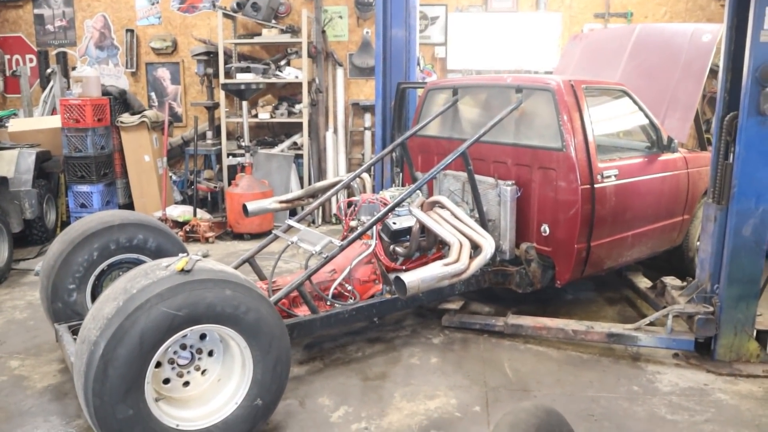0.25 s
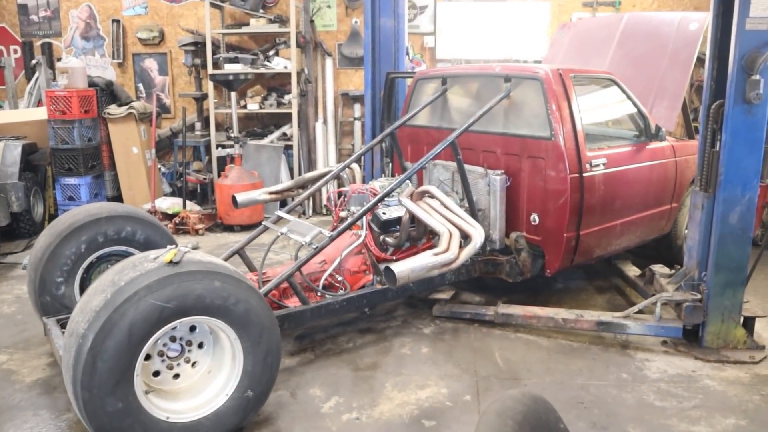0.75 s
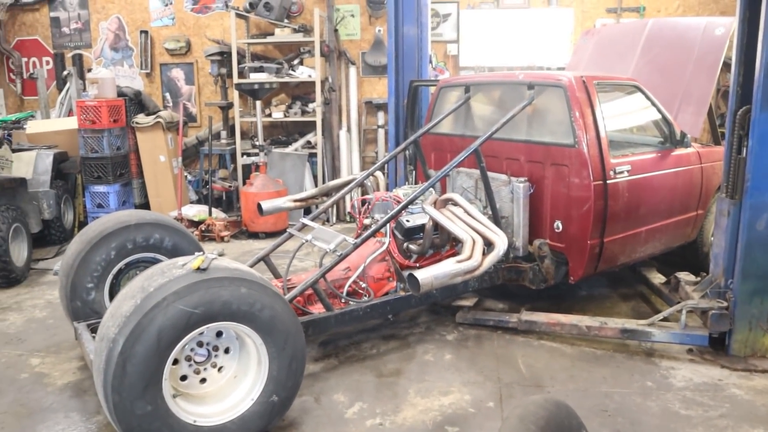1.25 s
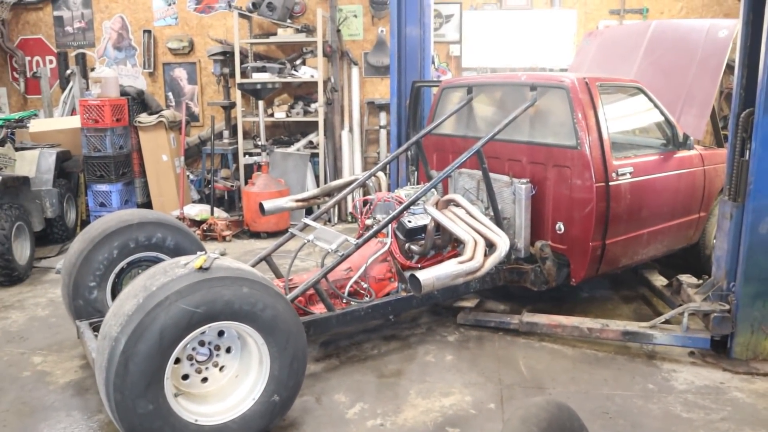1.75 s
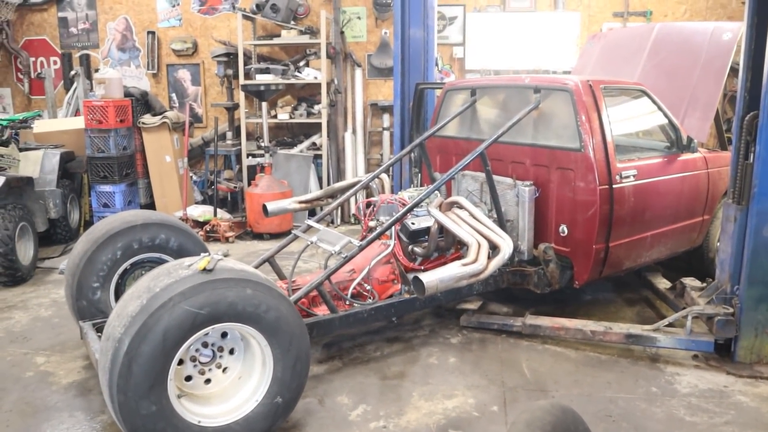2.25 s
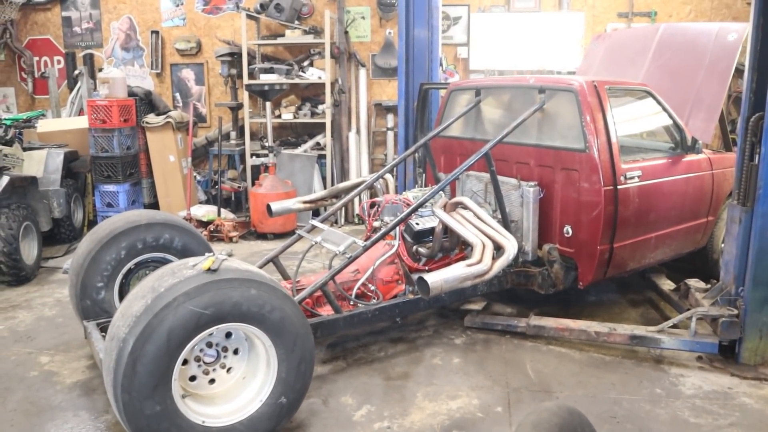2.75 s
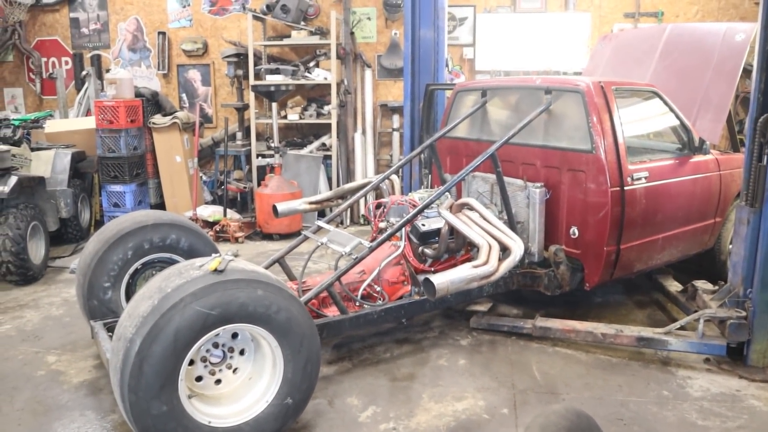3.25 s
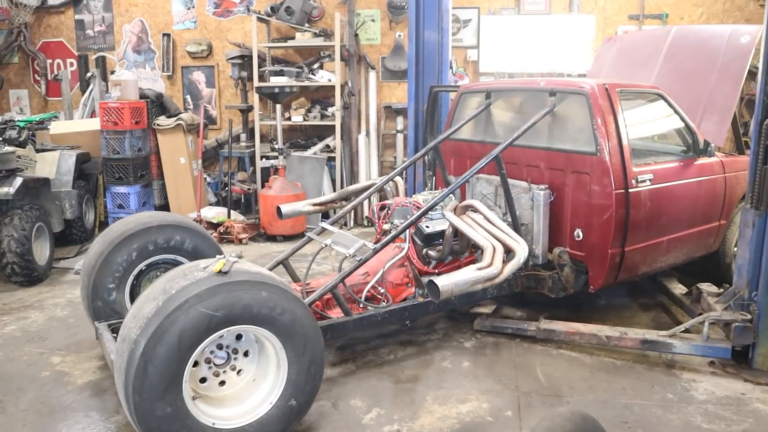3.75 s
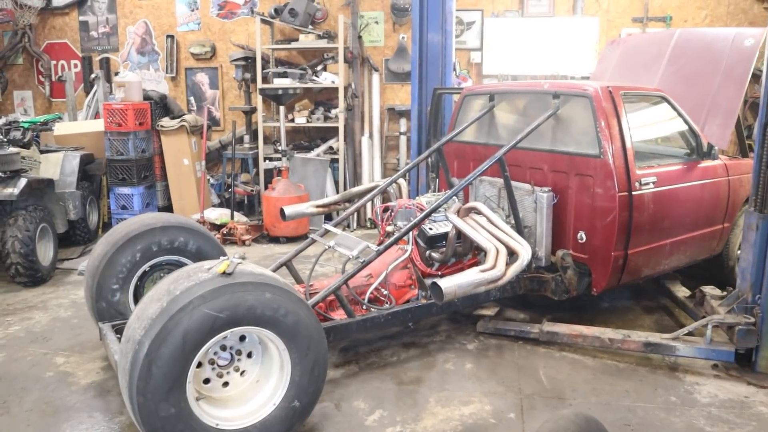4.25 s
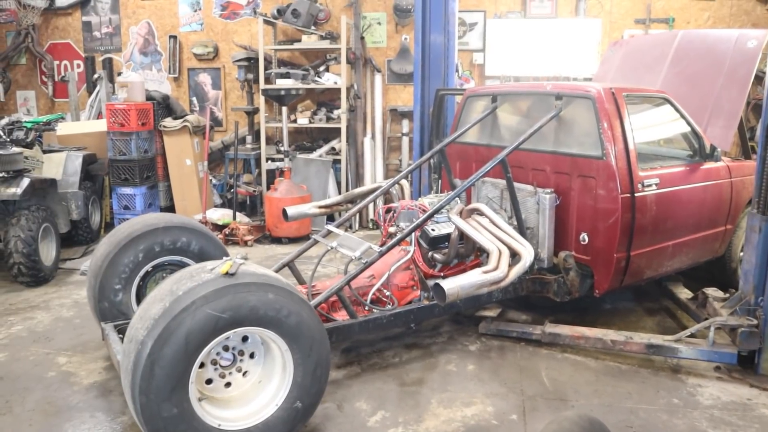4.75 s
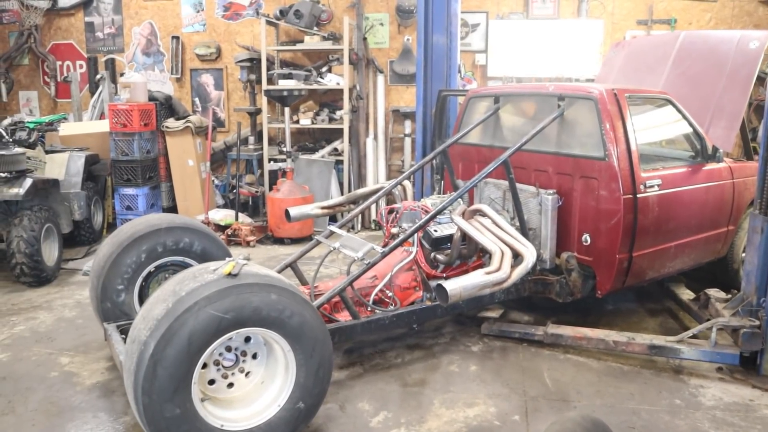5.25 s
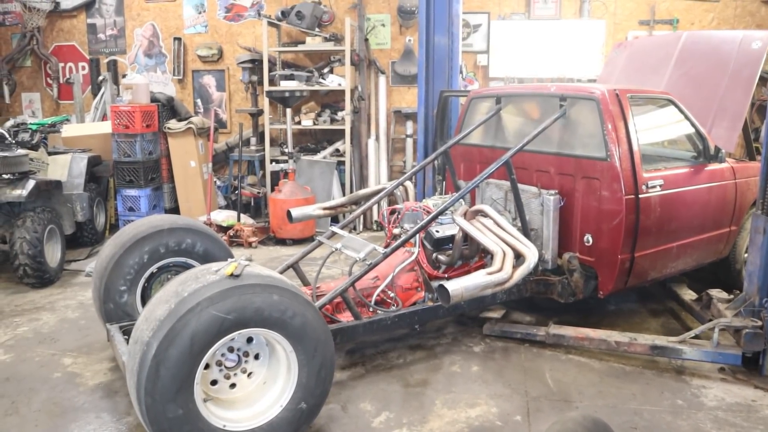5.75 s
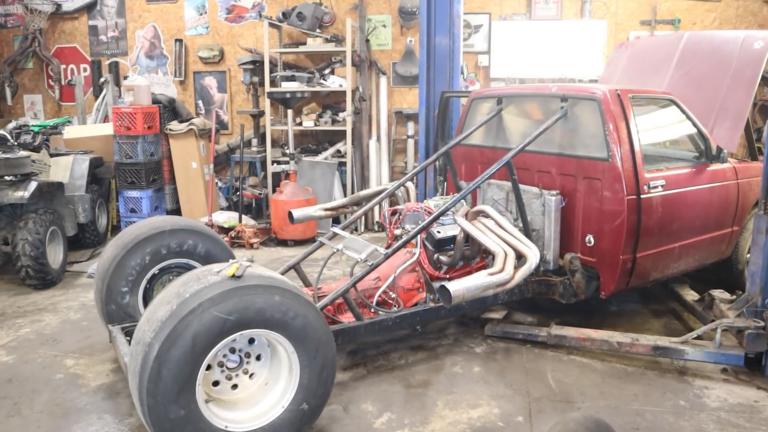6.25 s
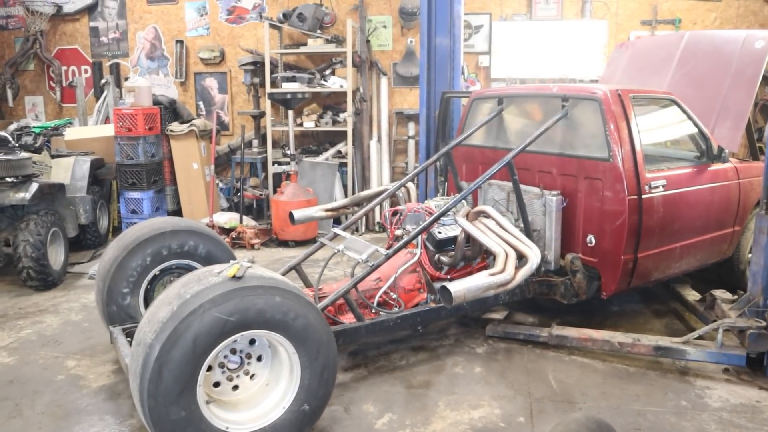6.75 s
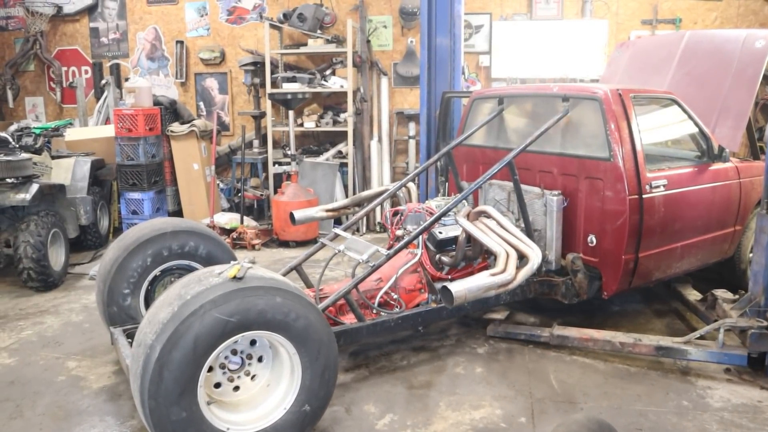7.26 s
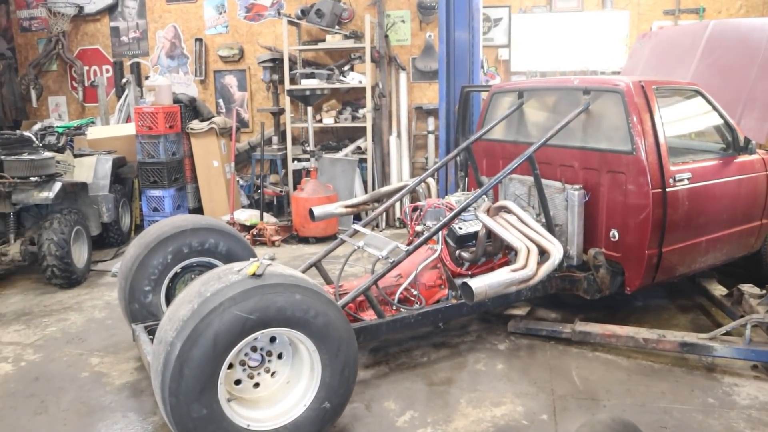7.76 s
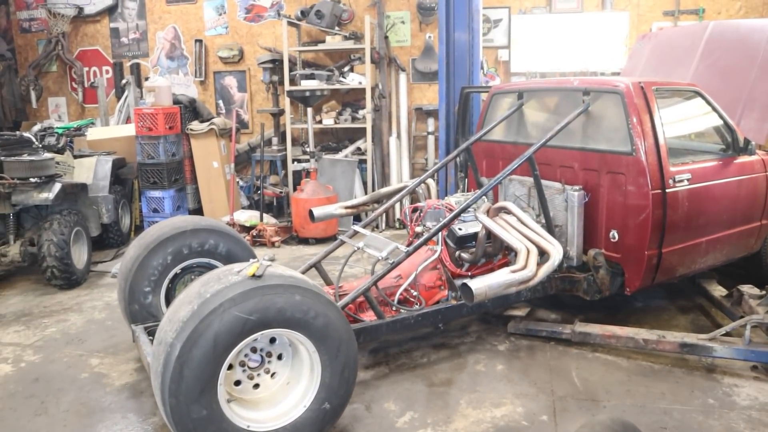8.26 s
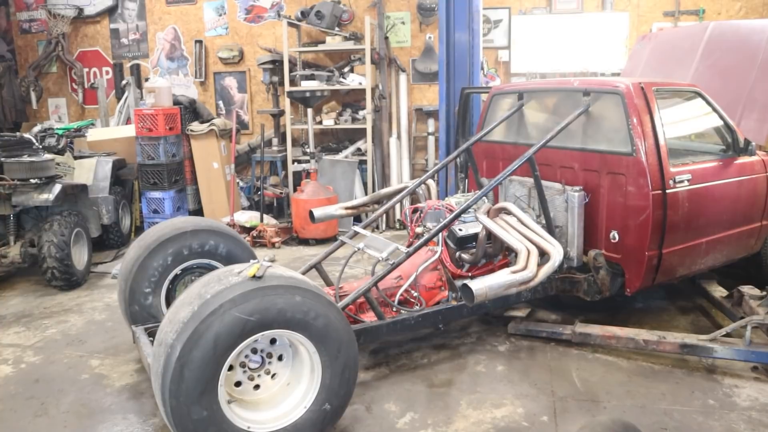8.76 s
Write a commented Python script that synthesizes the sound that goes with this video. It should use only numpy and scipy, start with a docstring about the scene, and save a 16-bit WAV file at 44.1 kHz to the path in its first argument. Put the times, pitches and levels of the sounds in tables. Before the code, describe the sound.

Close stereo pickup of a big engine being cranked in a workshop. After a brief quiet hum come a sharp clank, slow heavy first turns with low thuds, then steady chugging whir, tooth rattle and scraping, with occasional harder clanks. It cuts off into a short reverberant tail and high thin ringing. Under a second later the starter bites again, labours and picks up, still without ignition.

```python
"""A starter motor cranks a large V8 in a garage, twice, and the engine does not catch.
The motor whines at multiples of its shaft speed, and noise from its brushes rings in its housing.
Pinion teeth rattle and scrape on the ring gear, hardest as each compression lets go; single blows clank.
Open headers puff low while the frame thuds and the block rumbles, all from noise of set colours.
Two close microphone ports hear it with the garage's echo and hum; one thin ring outlasts the first try."""
import sys
import numpy as np
from scipy import signal
from scipy.fft import rfft, irfft, next_fast_len
from scipy.io import wavfile
from scipy.ndimage import uniform_filter1d, map_coordinates

SR = 44100
rng = np.random.default_rng(int(sys.argv[2]) if len(sys.argv) > 2 else 0)


def dump_mix(stems):
    """Bounce the given channels to the path in sys.argv[1] as a 16-bit WAV at rate SR."""
    frames = np.atleast_2d(stems).T  # one column per channel
    limited = np.clip(frames, -1, 1)  # hard clip at full scale
    pcm = np.round(limited * 32767).astype(np.int16)
    wavfile.write(sys.argv[1], SR, pcm)


def gain_from_db(level_db):
    """Turn a decibel level (scalar or array-like) into a linear amplitude factor."""
    decades = np.asarray(level_db, float) / 20
    return 10 ** decades


N = 397341  # length of the scene in samples


def unit(x):
    """Scales a sound to rms 1."""
    return x / np.sqrt(np.mean(x ** 2) + 1e-20)


def along(points, hz):
    """Reads a curve of (pitch_hz, value) points, spaced as the ear hears pitch (log axis)."""
    pitch_hz, value = np.transpose(points)
    return np.interp(np.log(hz + 1), np.log(pitch_hz + 1), value)


def curves(rows):
    """Draws one value per sample for each column after the time."""
    time_s, *columns = np.transpose(rows)
    return [np.interp(np.arange(N) / SR, time_s, column) for column in columns]


def wobble(rate):
    """A smooth random curve with rate new random values a second."""
    knots = rng.standard_normal(int(N * rate / SR) + 4)
    return map_coordinates(knots, [np.arange(N) * rate / SR])


def filtered(x, response):
    """Multiplies the spectrum of x by a response that depends on frequency."""
    padded = next_fast_len(N + SR // 2)
    spectrum = rfft(x, padded)
    return irfft(spectrum * response(np.fft.rfftfreq(padded, 1 / SR)), padded)[..., :N]


def modes(table):
    """Response of a set of resonances; each rings after it is struck, and neighbours have opposite sign."""
    def response(f):
        total = 0
        for k, (pitch, width, db) in enumerate(table):
            resonance = 1j * f * width / (pitch * pitch - f * f + 1j * f * width)
            total = total + (-1) ** k * gain_from_db(db) * resonance
        return total
    return response


def coloured(spectrum):
    """Noise of rms 1 with the given spectrum."""
    return unit(filtered(rng.standard_normal(N), lambda hz: gain_from_db(along(spectrum, hz))))


def patchy(x, depth_db, size=(5, 6)):
    """Random gain over patches of pitch and time, scaled back to rms 1."""
    z = signal.stft(x, nperseg=512)[2]
    across_pitch = uniform_filter1d(rng.standard_normal(z.shape), size[0], axis=0)
    field = uniform_filter1d(across_pitch, size[1], axis=1)
    return unit(signal.istft(z * gain_from_db(depth_db * unit(field)), nperseg=512)[1][:N])


def diffuse(pair, alike):
    """Mixes two unrelated signals so the ports hear them alike to a degree that depends on pitch."""
    def mix(hz):
        turn = np.arccos(np.clip(along(alike, hz), -1, 1)) / 2
        return np.array([np.cos(turn), np.sin(turn)])
    mid, side = filtered(pair, mix)
    return np.array([mid + side, mid - side])


# spectrum of the garage hum: pitch_hz, level_db
HUM_SPECTRUM = [(15, -73), (25, -35), (54, -9.5), (101, -7.5), (125, -12), (243, -9.5), (309, -15),
                (475, -17.5), (2400, -31.5), (6370, -42), (9270, -49), (10600, -45), (12700, -44),
                (15000, -74.5)]
# left-right likeness of sound from all sides, for hum and echo: pitch_hz, likeness (-1 to 1)
AROUND_ALIKE = [(150, 1), (300, .96), (500, .83), (800, .6), (1200, .2), (1800, -.1), (3500, -.5),
                (9000, -.62), (14000, -.5)]


def garage_hum():
    """The room's steady hum: coloured noise from all sides, wavering slightly in level."""
    waver_db = 0.6 * wobble(8)
    pair = np.array([coloured(HUM_SPECTRUM), coloured(HUM_SPECTRUM)])
    return diffuse(pair, AROUND_ALIKE) * gain_from_db(-47 + waver_db)


# how long the garage echoes take to fall by 60 dB: pitch_hz, t60_s
GARAGE_DECAY = [(200, 0.64), (800, 0.98), (3000, 0.65), (10000, 0.37)]


def garage_echo(x, count=30):
    """Echoes as a noise tail, each pitch dying at its own speed; a new tail for each of count stretches."""
    wet, step = np.zeros((2, N + 2 * SR)), N // count + 1
    delay = 100  # samples before the tail begins
    for start in range(0, N, step):
        hz, t, z = signal.stft(rng.standard_normal((2, SR)), SR, nperseg=256)
        decay = gain_from_db(-60 * t / along(GARAGE_DECAY, hz)[:, None])
        tail = signal.istft(z * decay, SR, nperseg=256)[1]
        tail = tail / np.linalg.norm(tail[0])
        answer = signal.fftconvolve(x[None, start:start + step], tail, axes=1)
        wet[:, start + delay:start + delay + answer.shape[1]] += answer
    return diffuse(wet[:, :N], AROUND_ALIKE)


def afterring():
    """One thin mode of the ring gear sings from 6.9 s: a pure tone that falls 60 dB in 1.6 s."""
    t = np.maximum(np.arange(N) / SR - 6.9, 0)
    return (t > 0) * gain_from_db(-58 - 60 * t / 1.6) * np.sin(2 * np.pi * 3865 * t)


# the crank, which labours at first; levels are before the swells are added:
# time_s, turns_done, gear_rattle_db, housing_drone_db
CRANK_PATH = [(0.6, -1.33, -60, -58), (0.625, -1.29, -22, -40), (0.7, -1.21, -19, -33),
              (0.78, -1.11, -21, -30), (0.85, -1, -28.5, -27), (0.95, -0.88, -30, -32),
              (1.06, -0.763, -23, -29), (1.2, -0.51, -23.5, -30), (1.32, -0.285, -24, -31),
              (1.42, -0.15, -26.5, -31), (1.497, 0, -23, -31), (2.037, 1, -23, -30), (2.628, 2, -23, -30),
              (3.185, 3, -23, -32), (3.785, 4, -23.5, -30), (4.349, 5, -24, -30), (4.952, 6, -23, -31),
              (5.512, 7, -23.5, -31), (6.102, 8, -23, -31), (6.668, 9, -23, -31), (6.81, 9.25, -23, -31),
              (6.9, 9.33, -25, -32), (7.06, 9.42, -39, -63), (7.915, 9.46, -46, -57),
              (7.93, 9.49, -26, -38), (7.955, 9.56, -30, -40), (7.985, 9.61, -26, -29),
              (8.075, 9.715, -27.5, -32), (8.25, 9.86, -30, -32), (8.342, 10, -25, -32),
              (8.43, 10.15, -26.5, -32), (8.525, 10.26, -24.5, -31), (8.87, 10.84, -25, -31),
              (8.95, 11, -23.5, -31), (9.01, 11.1, -24, -33)]


def crank():
    """Turns done by the crank, with the levels of rattle and drone that go with it, at each sample."""
    return curves(CRANK_PATH)


def from_mark(turns, mark):
    """Turns past a mark of the two-turn cycle, -1 to 1."""
    return (turns - mark + 1) % 2 - 1


# levels before swell and waver: time_s, header_puff_db, frame_thud_db, block_rumble_db
BLOCK_LEVELS = [(0.6, -65, -60, -43), (0.65, -52, -37, -35), (0.87, -50, -47, -38), (1.09, -52, -43, -39),
                (1.3, -68, -52, -39), (1.9, -66, -51, -41), (3.3, -70, -51, -39.5), (4.5, -70, -50, -39),
                (4.8, -70, -56, -43), (5.7, -72, -54, -41), (6.0, -72, -54, -44), (6.82, -70, -56, -41),
                (7.06, -70, -55, -52), (7.91, -60, -58, -51), (7.96, -65, -49, -39), (8.17, -53, -46, -40),
                (8.55, -68, -42, -41), (8.68, -66, -54, -41), (9.01, -72, -48, -42)]
# spectrum of the header puffs: pitch_hz, level_db
PUFF_SPECTRUM = [(20, -69), (32, -12.5), (42, -2), (62, 0), (85, -33), (120, -95.5)]
# spectrum of the frame thuds: pitch_hz, level_db
THUD_SPECTRUM = [(55, -40), (85, -11.5), (130, -5), (180, -1.5), (230, -38.5)]
# spectrum of the block rumble: pitch_hz, level_db
RUMBLE_SPECTRUM = [(110, -44), (180, -10), (242, 1.5), (329, -1.5), (376, -2.5), (429, -8.5), (560, -4),
                   (730, -48), (1230, -120)]


def block():
    """Air puffs in the open headers, the frame thuds and the block shakes: three bands of low noise."""
    puff_db, thud_db, rumble_db = curves(BLOCK_LEVELS)
    turns = crank()[0]
    # one header breathes hardest, once in two turns
    mark_turns, width_turns, swell_db = 0.55, 0.25, 12
    puff_db = puff_db + swell_db * np.exp(-(from_mark(turns, mark_turns) / width_turns) ** 2)
    puffs = gain_from_db(puff_db) * coloured(PUFF_SPECTRUM)
    thuds = gain_from_db(thud_db + 2 * wobble(5)) * coloured(THUD_SPECTRUM)
    return puffs + thuds + gain_from_db(rumble_db) * coloured(RUMBLE_SPECTRUM)


# a faint tick, solenoid tick, pinion slam and hardest tooth blows; level before shaping and filtering:
# start_s, level_db, crack_share (0-1), t60_s
HARD_BLOWS = [(0.172, -47, 1, 0.06), (0.6072, -20, 0.85, 0.07), (0.62, 1.5, 0.25, 0.06),
              (0.6445, 0, 0.8, 0.07), (1.0422, -10, 0.6, 0.07), (2.1544, -14, 0.5, 0.07),
              (2.6229, -9, 0.4, 0.07), (3.3239, -12, 0.4, 0.07), (3.935, -9, 0.5, 0.057),
              (5.081, -13, 0.6, 0.07), (5.6284, -10, 0.5, 0.07), (6.2504, -10.5, 0.4, 0.07),
              (6.7767, -15, 0.6, 0.07), (7.911, -23, 0.7, 0.07), (7.9264, -4, 0.9, 0.06)]
# resonances of ring gear and bell housing, also rung by gears(): pitch_hz, width_hz, level_db
RING_MODES = [(1493, 30, -4), (1634, 25, -2), (1920, 130, -5), (2225, 40, -3), (2490, 112, -2.5),
              (3040, 60, -0.5), (3220, 98, 0.5), (3320, 90, 1), (3773, 120, 0), (4206, 90, -2),
              (4625, 110, -1), (5015, 60, -2), (6370, 70, -5)]
# spectrum of the crack of a hard blow: pitch_hz, level_db
CRACK_SPECTRUM = [(500, -30), (1400, -7), (3200, -6), (5200, -3), (8000, -9), (11500, -13), (15000, -30)]


def blows():
    """Single hard metal contacts: a short burst of noise, part into the ring gear, part broad crack."""
    x, t = np.zeros((2, N + SR)), np.arange(SR // 5) / SR
    for start_s, db, crack_share, t60 in HARD_BLOWS:
        envelope = gain_from_db(db - 60 * t / t60) * (1 - np.exp(-t / 0.0036))
        burst = envelope * rng.standard_normal(len(t))
        start = round(start_s * SR)
        x[:, start:start + len(t)] += np.outer([1 - crack_share, crack_share], burst)
    # the bell housing adds a broad clank around 2430 Hz
    clank = filtered(x[0, :N], modes([(2430, 910, 5)] + list(RING_MODES)))
    crack = filtered(x[1, :N], lambda hz: gain_from_db(along(CRACK_SPECTRUM, hz)))
    return 1.28 * clank + 1.5 * crack


# eight compressions let go in two turns:
# release_turns into the cycle, rattle_peak_db, rise_db per turn, fall_db per turn
COMPRESSIONS = [(-0.01, 1.5, 160, 65), (0.255, 1.5, 200, 55), (0.465, -1, 110, 80), (0.685, -3, 110, 65),
                (0.99, 1, 160, 95), (1.232, 2, 95, 105), (1.48, 0, 95, 95), (1.71, -3.5, 110, 65)]


def surges_db(turns):
    """Each compression swells the rattle toward its release and lets it fall after."""
    cycle = np.arange(0, 2, .002)
    power = gain_from_db(2 * -12.5)  # the grind between compressions, -12.5 dB
    for mark, db, rise, fall in COMPRESSIONS:
        past = from_mark(cycle, mark)
        power = power + gain_from_db(2 * (db + np.minimum(rise * past, -fall * past)))
    return np.interp(turns, cycle, 10 * np.log10(power), period=2)


# spectrum of the teeth scraping: pitch_hz, level_db
SCRAPE_SPECTRUM = [(590, -30.5), (1000, -3), (1360, -12), (1470, -6), (2800, -4), (3250, 1.5), (3520, -6.5),
                   (6560, -6.5), (11600, -23.5), (15000, -31.5)]


def gears():
    """Dense tooth contacts of uneven size ring the gear; a broad scrape rides on them."""
    turns, rattle_db, _ = crank()
    surge_db = surges_db(turns)
    # harder contact adds treble, whose extra swell peaks 0.02 turns ahead of the rattle
    bright_db = 0.62 * (rattle_db + surges_db(turns + 0.02) + 34)
    # the lower scrape swings less with the compressions, by a share of 0.45
    steady_db = -0.45 * (surge_db + 4)
    rattle_db = rattle_db + surge_db
    flare_db = 0.35 * (rattle_db + 26.5)  # harder contact rings the gear more
    contacts = (rng.random(N) < 2500 / SR) * rng.standard_normal(N)  # about 2500 a second
    ring = patchy(filtered(contacts, modes(RING_MODES)), depth_db=3.2)
    flicker_db = 2.1 * wobble(150) + 2.1 * wobble(35)
    scrape = patchy(coloured(SCRAPE_SPECTRUM) * gain_from_db(flicker_db), depth_db=2.0)
    # split the scrape near 1900 and 5000 Hz
    below_5000 = filtered(scrape, lambda hz: 1 / (1 + (hz / 5000) ** 4))
    body = filtered(scrape, lambda hz: 1 / (1 + (hz / 1900) ** 4))
    middle, treble = below_5000 - body, scrape - below_5000
    shaped_scrape = gain_from_db(steady_db) * body + middle + gain_from_db(bright_db) * treble
    return gain_from_db(rattle_db) * (0.95 * gain_from_db(flare_db) * ring + shaped_scrape)


# strengths of the whine's tones: shaft_multiple, level_db
SHAFT_ORDERS = [(2, -7.5), (3, -6), (5, -12), (6, -1), (7, 0.5), (8, -7.5), (9, -13), (12, -5)]
# resonances of the starter housing: pitch_hz, width_hz, level_db
HOUSING_MODES = [(668.4, 54.5, -3.5), (707, 72, -0.5), (751, 58, -1.5), (844, 55, -2.5), (864, 91, -4.5),
                 (1051, 217, -14), (1147, 163, -12.5)]
# the drone over one crank turn, swelling as the load comes back: turn_share (0-1), level_db
TURN_LOAD = [(0.05, 1), (0.23, -5), (0.33, 1), (0.47, -3), (0.6, 4), (0.65, -1), (0.8, 2), (0.85, -4),
             (0.9, 3), (0.95, -5)]


def motor():
    """Slightly unsteady shaft orders over brush noise ringing in the housing."""
    turns, _, drone_db = crank()
    load_db = np.interp(turns, *np.transpose(TURN_LOAD), period=1)
    drone_db = drone_db + load_db + 1.5 * wobble(14)
    shaft_hz = 124.24 * (1 + 0.009 * wobble(8))
    angle = 2 * np.pi * np.cumsum(shaft_hz) / SR
    whine = np.zeros(N)
    for multiple, db in SHAFT_ORDERS:
        phase = 2 * np.pi * rng.random()
        whine += gain_from_db(db + 2.7 * wobble(12)) * np.sin(multiple * angle + phase)
    brushes = gain_from_db(2.02 * wobble(45)) * rng.standard_normal(N)
    drone = unit(filtered(brushes, modes(HOUSING_MODES))) + 0.35 * unit(whine)
    # it flutters fast but holds its strength from moment to moment
    strength = np.sqrt(np.abs(uniform_filter1d(drone ** 2, size=3000)) + 1e-3)
    return gain_from_db(drone_db) * drone / strength


# the two tries at cranking: start_s, end_s
CRANK_TRIES = [(.6, 7.06), (7.91, 9.01)]


def engaged():
    """1 while the starter has current, with short ramps; it takes hold 22 ms into each try."""
    t = np.arange(N) / SR
    on = sum(((t > start + .022) & (t < end)) * 1. for start, end in CRANK_TRIES)
    return uniform_filter1d(on, size=300)


def engine():
    """Motor, gears and block sound only under current; the single blows sound on their own."""
    return engaged() * (motor() + gears() + block()) + blows()


# left-right likeness of the near engine: pitch_hz, likeness (-1 to 1)
ENGINE_ALIKE = [(150, 1), (300, .99), (500, .95), (800, .98), (1200, .6), (2600, .35), (4000, .4),
                (7500, .75), (10500, .85), (14000, .55)]
# how far the left port runs ahead of the right: pitch_hz, left_lead_radians
PORT_LEAD = [(500, 0), (1200, -.4), (1800, -.3), (2600, -1.2), (3800, -1.1), (5300, -1.8), (7600, -2.3),
             (10500, -2.7), (14000, -2.6)]
# how much louder the left port is than the right: pitch_hz, left_minus_right_db
PORT_LEAN = [(300, 0), (700, -1.9), (2500, -2.8), (5500, 2.4), (12000, .3)]


def at_ports(parts):
    """The wide engine reaches the two ports unlike and out of step in the treble."""
    def ports(hz):
        lean_db, lead = along(PORT_LEAN, hz), along(PORT_LEAD, hz)
        # each port takes half of the difference
        return np.array([gain_from_db(side * lean_db) * np.exp(1j * side * lead) for side in (.5, -.5)])
    return filtered(diffuse(parts, ENGINE_ALIKE), ports)


def scene():
    """The engine at the two ports, with echo and hum from all sides and the thin ring in the middle."""
    parts = np.array([engine(), engine()])  # two random versions give the engine its width
    echo = gain_from_db(-6) * garage_echo(parts[0])
    return at_ports(parts) + echo + afterring() + garage_hum()


def roll_off(x):
    """The treble ends steeply here."""
    return signal.sosfilt(signal.butter(12, 15190, fs=SR, output="sos"), x)


def record(dry):
    """Hands on the finished mix, with no change of level."""
    return roll_off(dry)


dry = scene()
out = record(dry)
dump_mix(out)
```